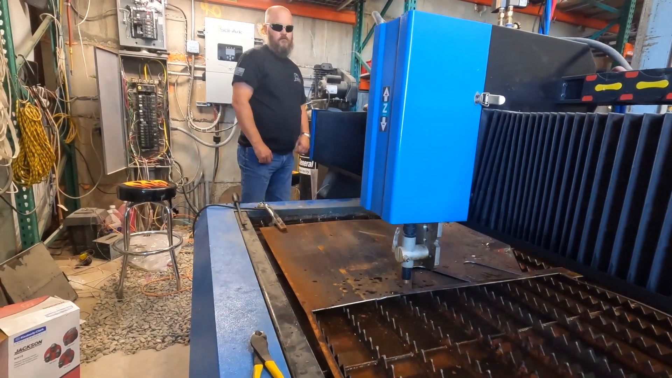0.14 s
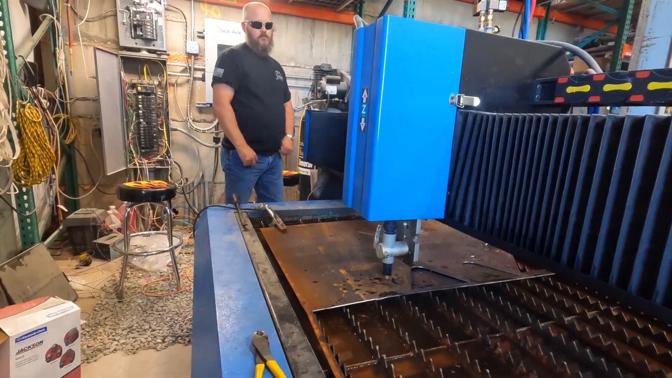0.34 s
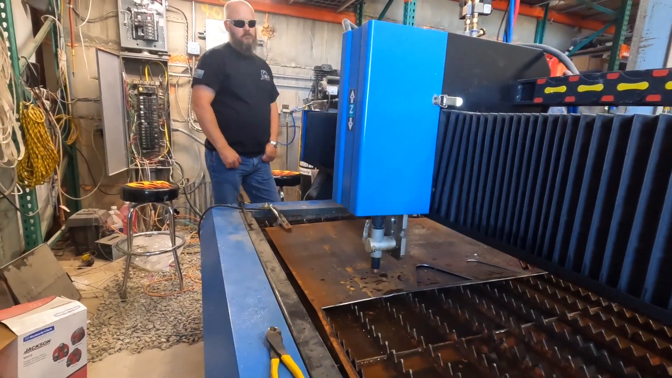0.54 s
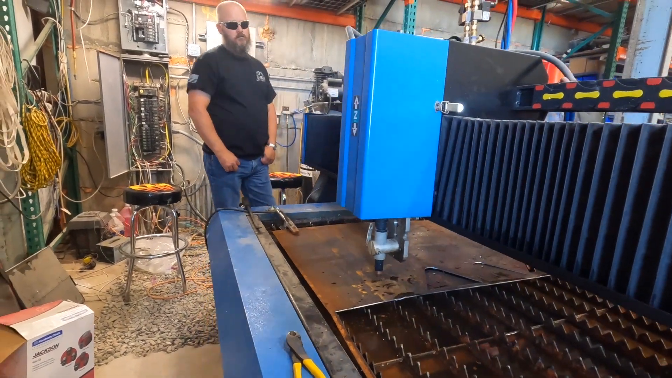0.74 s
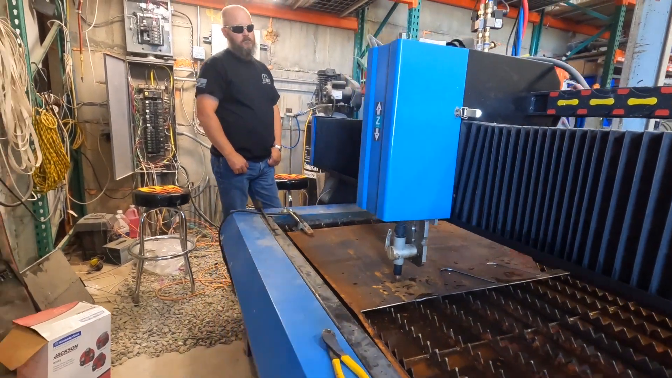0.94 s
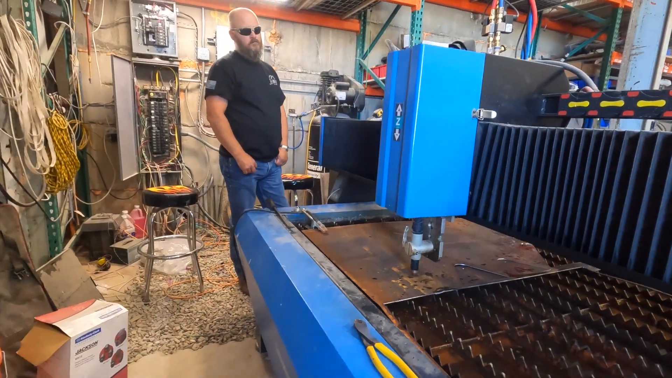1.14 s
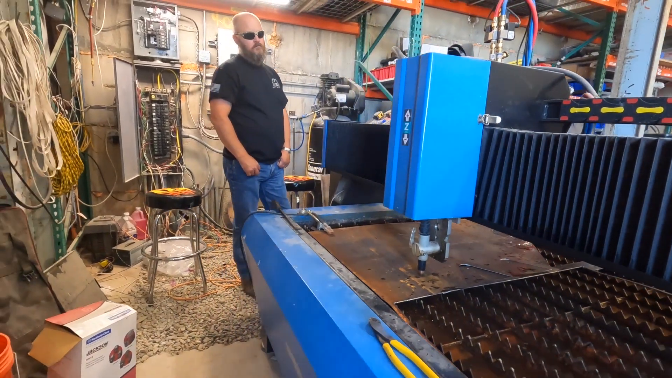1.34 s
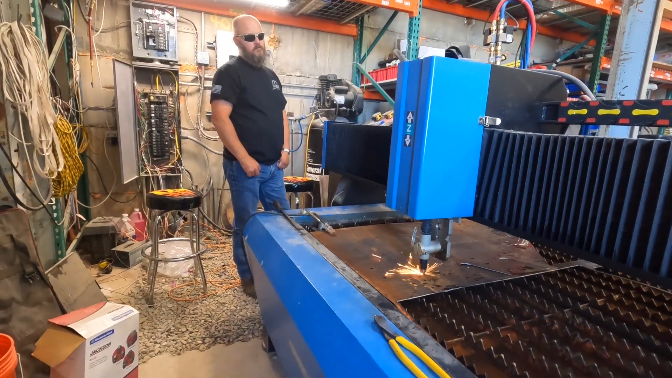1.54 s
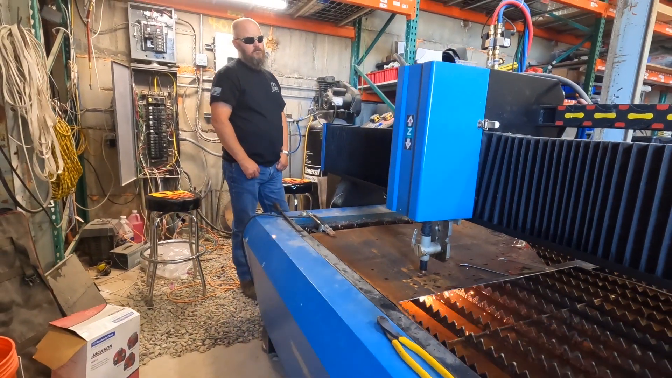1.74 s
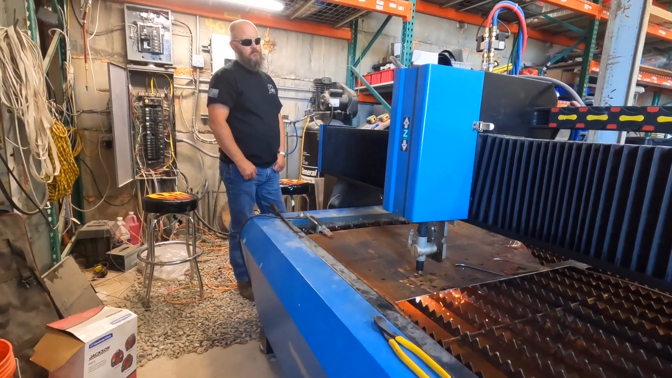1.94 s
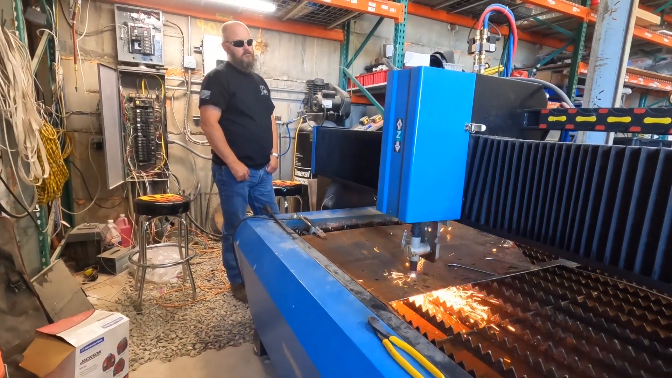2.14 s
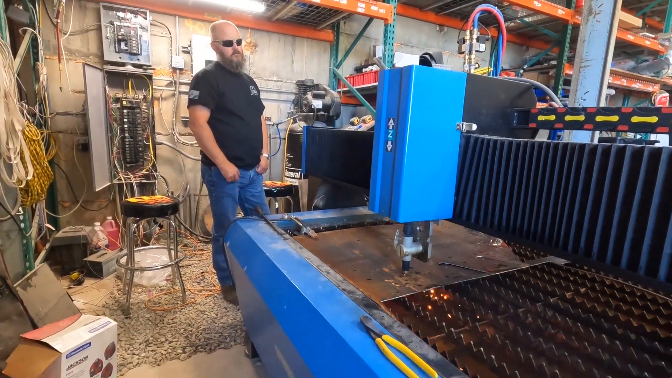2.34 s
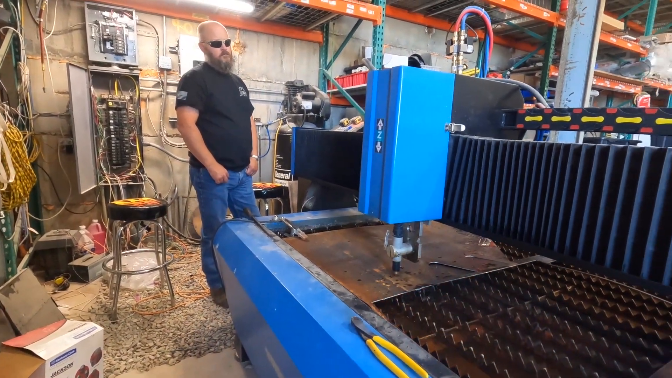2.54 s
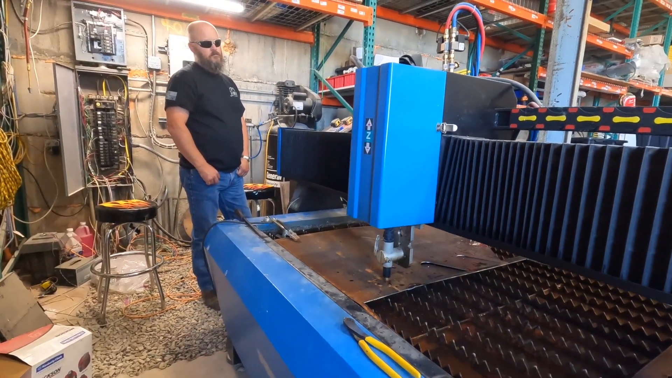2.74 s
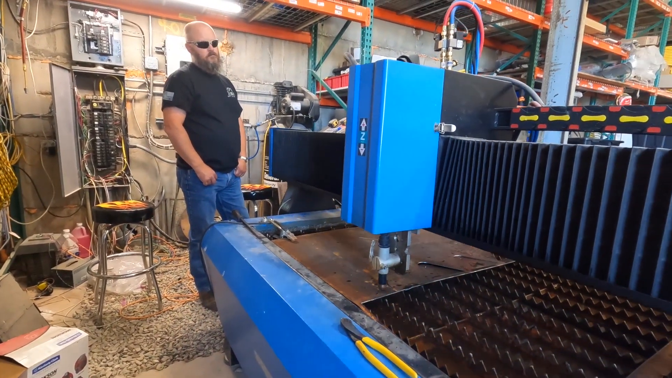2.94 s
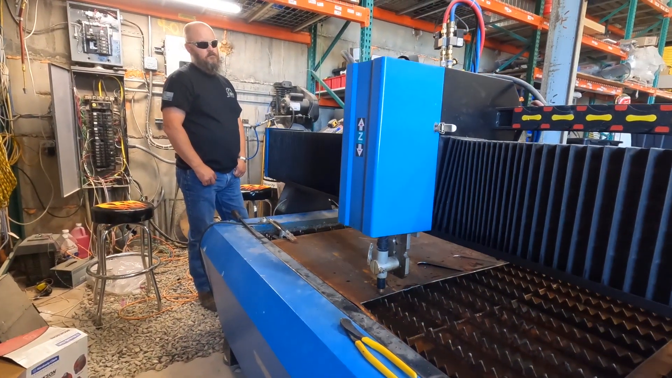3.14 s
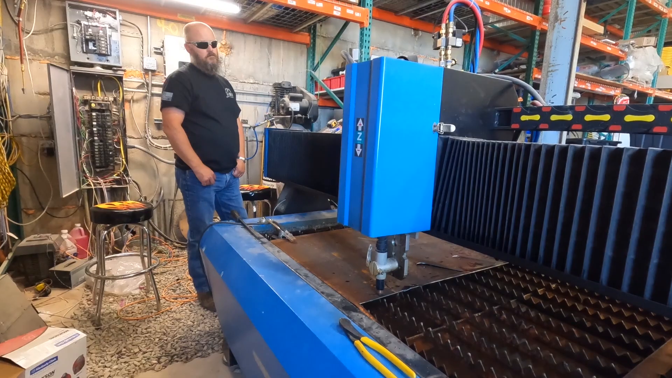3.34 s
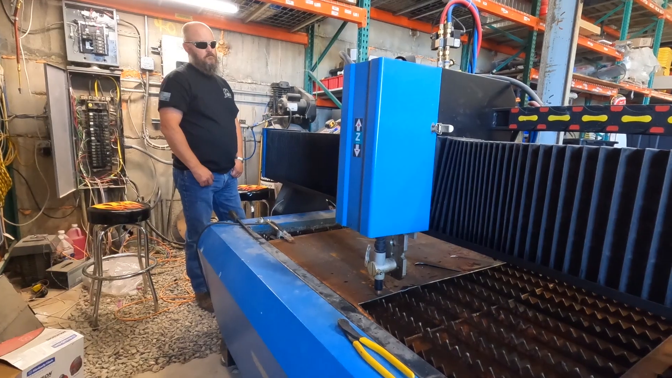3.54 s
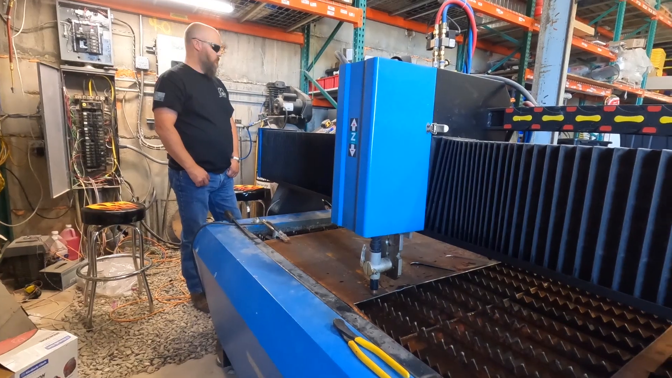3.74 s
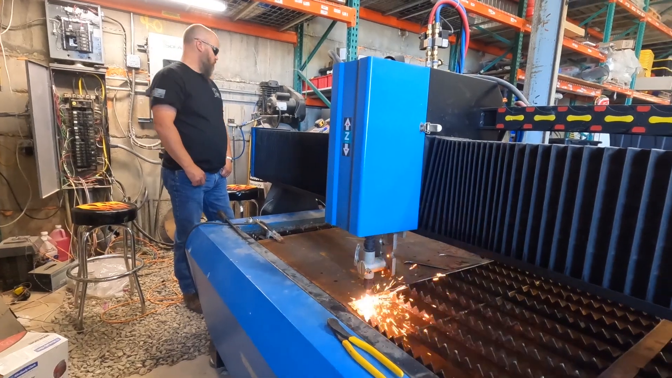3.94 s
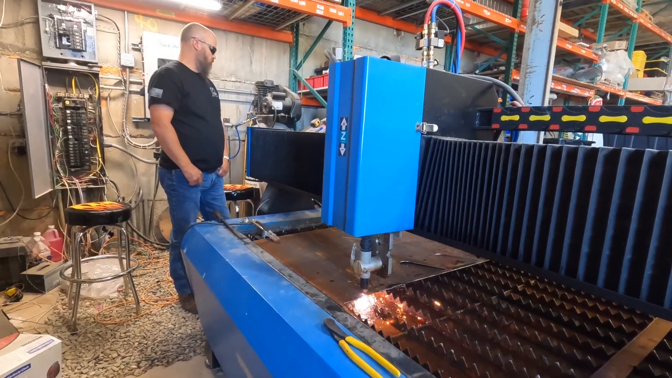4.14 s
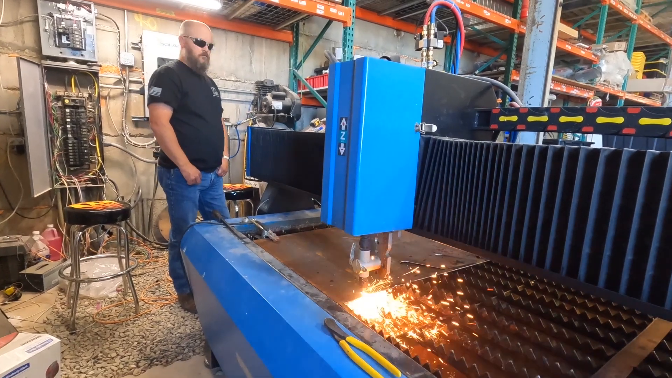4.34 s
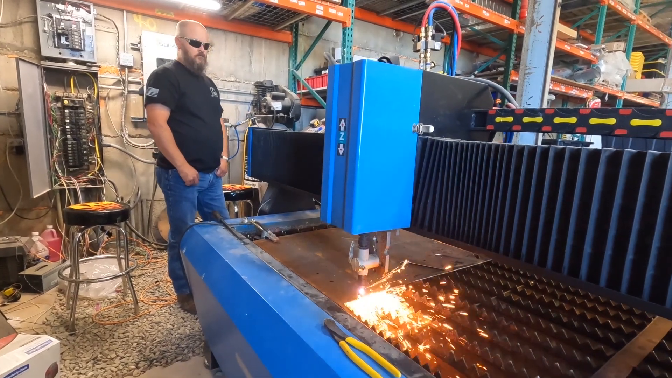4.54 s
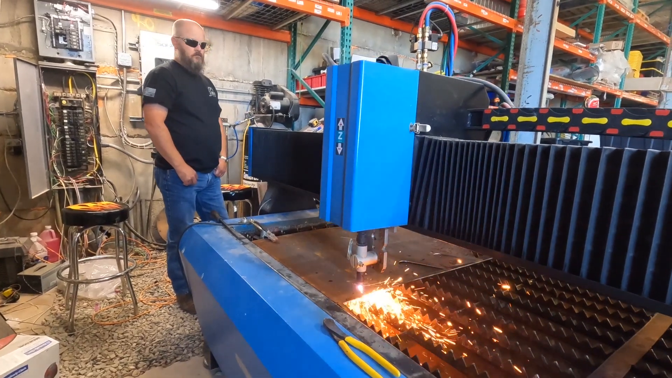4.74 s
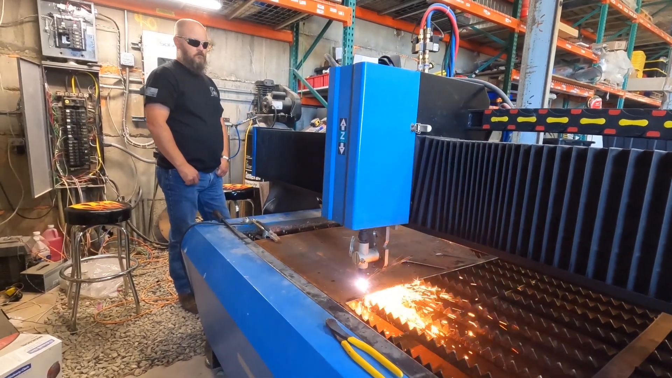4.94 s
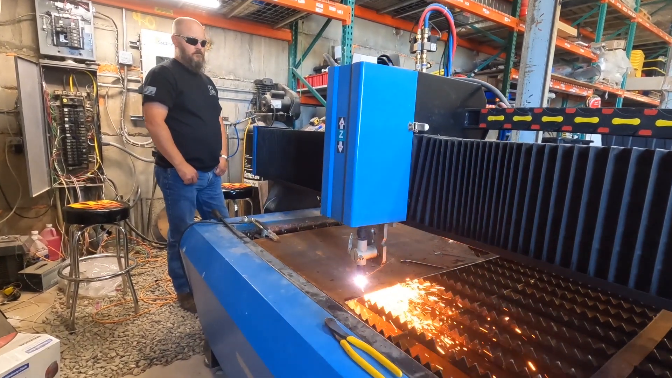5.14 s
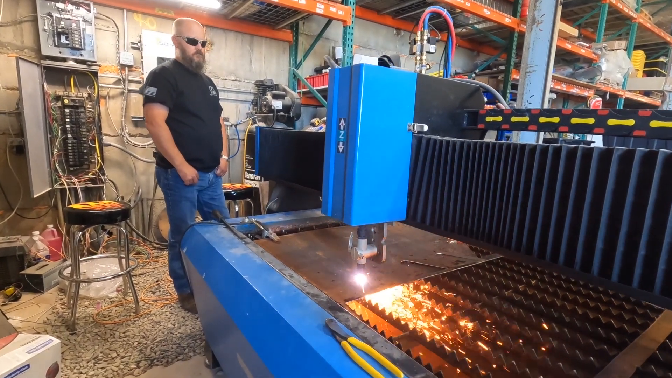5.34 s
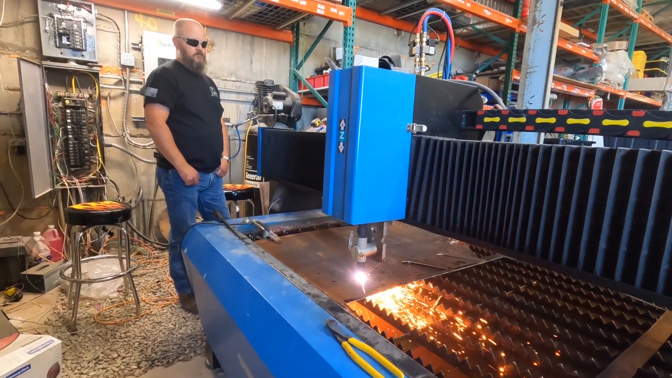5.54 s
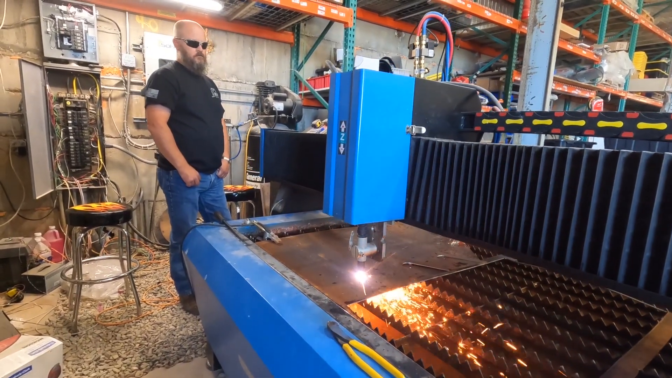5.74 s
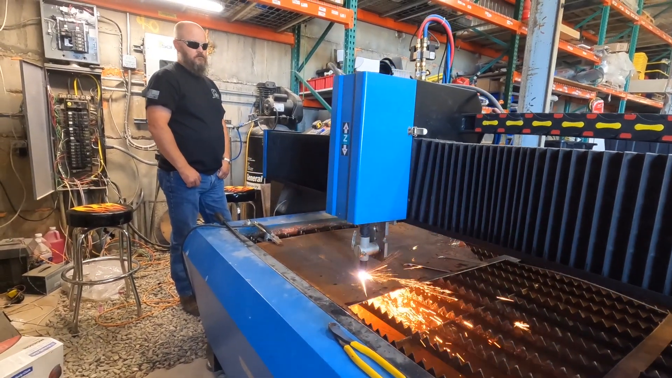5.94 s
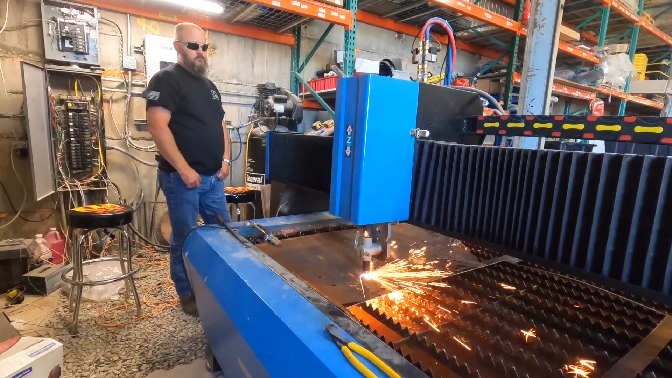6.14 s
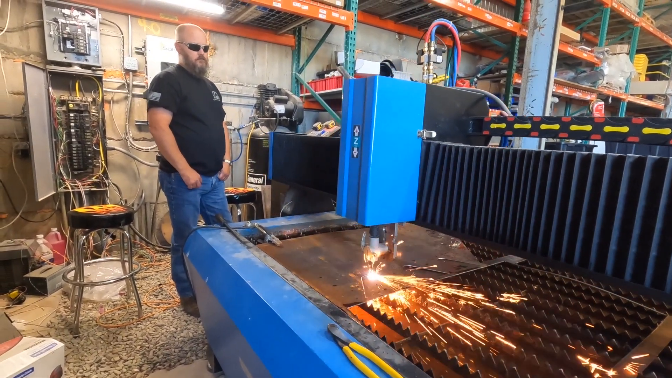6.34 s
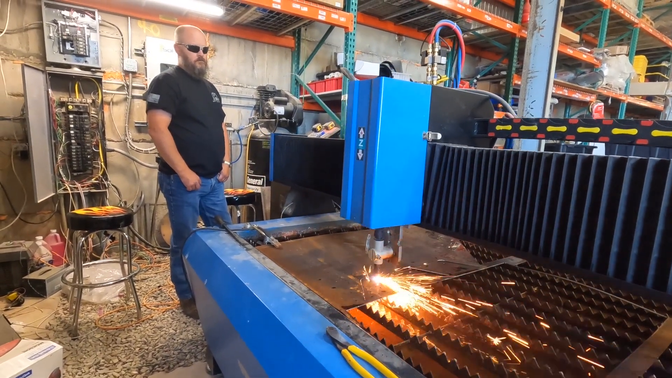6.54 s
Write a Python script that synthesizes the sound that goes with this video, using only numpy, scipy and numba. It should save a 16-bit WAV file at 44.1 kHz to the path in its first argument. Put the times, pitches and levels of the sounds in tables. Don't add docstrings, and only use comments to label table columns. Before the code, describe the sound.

Plasma torch close up: thin air hiss, short gap, sputtering pierce that cuts out, more air, another gap, then a loud steady howling cut through steel.

```python
import sys
import numpy as np
from scipy import signal
from scipy.io import wavfile
from numba import njit

SR = 44100
rng = np.random.default_rng(int(sys.argv[2]) if len(sys.argv) > 2 else 0)


def materialize(psi):
    bounded = np.clip(np.atleast_2d(psi).T, -1, 1)
    quanta = np.round(bounded * 32767).astype(np.int16)
    wavfile.write(sys.argv[1], SR, quanta)


def natural_amplitude(level_db):
    exponent = np.asarray(level_db, float) / 20
    return 10 ** exponent


N = 290619

# (opens [s], rise [s], steepness of the rise [power], shuts [s], fall [dB/s])
STAGES = [
    (-.2, .05, 1, 1.225, 159),
    (1.533, 0.052, 1.65, 2.24, 900),
    (2.312, 0.042, .75, 2.48, 100),
    (2.46, 0.094, 0.67, 3.565, 400),
    (3.85, 0.057, 5.5, 3.912, 401),
    (3.926, 0.0063, 1, 7, 303),
]
# (low edge [Hz], high edge [Hz])
AIR_BANDS = [(13250, 14200), (14200, 14750), (14750, 15150)]


def torch():
    # (frequency [Hz], density [dB per Hz])
    melt_colour = [(70, -40), (130, -28), (190, -15.5), (240, -2), (330, -12), (450, 0)]
    arc_colour = [(220, -30), (380, -21.5), (444, -13.5), (738, 1), (824, -1), (1030, -3), (1800, 2),
                  (2340, -49), (3960, -120)]
    nozzle_colour = [(7200, 3), (8200, -8), (8900, -11.5), (9600, -5.5), (10500, -1), (11300, 1.5),
                     (12200, -3.5), (13000, -12), (13700, -37)]
    # (time [s], factor [1])
    patchiness = [(0, 2.7), (1.5, 2), (1.6, 0.77), (2.4, 0.6), (5.8, 0.51), (6.0, 1.6), (6.25, 2.1),
                  (6.35, 1.9), (6.59, 2.2)]

    rumble_db, roar_db, hiss_db, sizzle_db = levels()
    gust_db = gusts()
    roar_db = with_tail(roar_db, wet_db=-13, t60=0.35) + 0.62 * gust_db
    hiss_db = with_tail(hiss_db, wet_db=-11, t60=0.34) + gust_db
    sizzle_db = with_tail(sizzle_db, wet_db=-6.5, t60=0.19) + 0.78 * gust_db
    flow = 0.33 * drift(13.0) + 0.62 * drift(63)
    flutter, = in_time(patchiness)

    out = natural_amplitude(rumble_db) * turbulence(melt_colour, 0.84 * flow, patchy_db=5.5, count=7)
    roar = natural_amplitude(roar_db - 1.0) * turbulence(arc_colour, 2.1 * flow, patchy_db=1.43, count=7)
    out += [echoed(roar[0]), roar[1]]
    crackle_db = 0.89 * flow + 1.3 * drift(170)
    out += natural_amplitude(sizzle_db) * turbulence(nozzle_colour, crackle_db, patchy_db=0.95 * flutter, count=12)
    hiss = natural_amplitude(hiss_db) * thin_start(hollowed(jet(flow, flutter)))
    out[0] += echoed(hiss + whistles())
    out[0] += natural_amplitude(roar_db + 0.49 * flow) * plate_ring()
    return out, natural_amplitude(sizzle_db) * air(flutter)


def jet(flow, flutter):
    # (frequency [Hz], density [dB per Hz])
    hiss_colour = [(1600, -3.5), (1900, -2), (3000, 0), (4500, 3.5), (6000, 0), (7000, -1), (7800, -17.5)]
    # (from [s], to [s], broad hiss [dB], width of howls [factor])
    courses = [
        (0, 0.497, -7, 0.89),
        (.55, 1.52, -6, 0.71),
        (1.6, 2.317, -3.5, 1),
        (2.35, 3.57, -2, 1),
        (3.87, 4.7, -3.5, 0.85),
        (4.86, 5.902, -4, 0.89),
        (6.152, 6.592, -4.5, 0.78),
    ]
    # (start pitch [Hz], end pitch [Hz], start and end over hiss [dB, dB])
    howls = [
        [(1030, 1150, -34, -31), (2750, 2280, -9.5, -13.5), (3560, 3980, -5.5, -2), (5550, 5600, -6, -8.5)],
        [(1080, 1200, -28, -25.5), (2300, 3300, -8, -20), (3980, 4500, -2.5, -12.5), (5980, 4700, -10, -13)],
        [(1520, 1700, -29, -27), (2150, 2630, -1, -3.5), (3260, 3770, -8, -7), (5100, 5040, -10, -8.5)],
        [(1190, 1300, -17.5, -21.5), (2728, 2800, -10, -12.5), (4600, 4250, -17, -19), (5740, 5500, -17, -10.5)],
        [(1800, 1680, -16.5, -24), (2390, 2270, -6, -13.5), (3390, 3440, -3, -8.5), (4720, 5100, -14, -9.5)],
        [(1730, 1520, -16, -21), (2530, 2760, -7, -11.5), (3450, 3350, -6, -4), (5060, 5300, -11, -10.5)],
        [(1740, 1600, -32, -26), (2350, 2520, -14.5, -5), (3800, 4240, -12.5, -11), (4850, 4420, -12, -12)],
    ]
    howl_widths = (530, 940, 900, 875)

    broad_db, spread = in_time([(s, db, w) for start, end, db, w in courses for s in (start, end)])
    out = natural_amplitude(broad_db) * turbulence(hiss_colour, 1.4 * flow, patchy_db=1.52 * flutter, count=14)[0]
    for k, width_hz in enumerate(howl_widths):
        path = [(course[side], *four[k][side::2]) for course, four in zip(courses, howls) for side in range(2)]
        hz, level_db = in_time(path)
        wander = 1 + 0.008 * drift(20) + 0.013 * drift(3)
        flicker_db = 0.49 * flow + 1.8 * drift(25)
        sway_db = 1.2 * np.minimum(flutter, 1) * drift(2.7)
        out += natural_amplitude(level_db + flicker_db + sway_db) * narrow_noise(hz * wander, spread * width_hz)
    return out


def levels():
    # (melt rumble [dB], arc roar [dB], nozzle sizzle [dB])
    stage_mix = [
        (-60, -47.5, -51.5),
        (-44, -28.5, -34.5),
        (-63, -40.5, -42),
        (-61.5, -46.5, -37),
        (-60, -46, -27),
        (-56, -32.5, -34),
    ]
    # (time [s], level [dB])
    jet_force = [(0, -20), (.05, -23.5), (.45, -27.5), (.87, -28.5), (.96, -29), (1.22, -30.5),
                 (1.56, -21.5), (1.9, -22.5), (2.28, -21.5), (2.36, -25), (2.85, -22.5), (2.97, -21.5),
                 (3.55, -23), (3.95, -18.5), (4.09, -19.5), (5.12, -19.5), (6.1, -19.5), (6.59, -24.5)]
    # (time [s], roar [dB], melt over roar [dB], t60 [s])
    bites = [(.588, -53, 5.5, .15), (.674, -53, 7, 0.17), (.94, -39, -21, 0.48), (1.646, -22, -9, 0.19),
             (1.86, -23, -14, 0.5), (2.14, -33, -24, 0.37), (2.312, -26, -8.5, 0.24),
             (2.385, -32, -33, 0.42), (3.3, -41, -26, .5), (3.52, -44.5, -7, 0.19),
             (3.937, -23, -14, 0.044), (4.2, -31.5, -18, 1.2), (5.0, -34.5, -20, 1.3),
             (5.5, -40, -12, 0.25), (5.999, -33.5, -8, 0.23), (6.11, -33, -15, 0.23)]
    rise_s, low_fall = 0.01, 2.5

    rumble_db, roar_db, sizzle_db = np.transpose(stage_mix)
    roar = natural_amplitude(2 * valve(roar_db, 0.68, low_fall))
    rumble = natural_amplitude(2 * valve(rumble_db, 0.9, low_fall))
    for s, db, melt_db, t60 in bites:
        t = np.arange(N) / SR - s
        decay_db = db - 60 * np.maximum(t, 0) / t60
        bite = np.clip(1 + t / rise_s, 0, 1) ** 2 * natural_amplitude(2 * decay_db)
        roar = roar + bite
        rumble = rumble + natural_amplitude(2 * melt_db) * bite
    hiss_db = in_time(jet_force)[0] + valve(np.zeros(len(STAGES)), 0, 0.93)
    return 10 * np.log10(rumble), 10 * np.log10(roar), hiss_db, valve(sizzle_db, 0, 0.85)


def valve(hold_db, lag, fall_share):
    t, gain = np.arange(N) / SR, np.full(N, 1e-6)
    for (opens, rise, power, shuts, fall), db in zip(STAGES, hold_db):
        swell = np.clip((t - opens) / rise - lag, 0, 1) ** power
        fallen_db = fall_share * fall * np.maximum(t - shuts, 0)
        gain = np.maximum(gain, swell * natural_amplitude(db - fallen_db))
    return 20 * np.log10(gain)


def gusts():
    # (time [s], swing [dB], half length [s])
    swings = [(0.065, 2.5, 0.008), (0.26, -2.3, 0.02), (0.53, 1, 0.0073), (0.653, -1.5, 0.04),
              (0.77, 1.7, 0.027), (0.858, -0.5, 0.022), (0.975, 1.3, 0.027), (1.065, -1, 0.008),
              (1.661, 2.5, 0.0087), (1.77, 1, 0.014), (1.803, -0.5, 0.0071), (1.91, -1.8, 0.013),
              (1.95, 2.5, 0.008), (2, -2, 0.012), (2.042, -0.3, 0.015), (2.153, -0.2, 0.02),
              (2.284, 3.5, 0.014), (2.823, -0.5, 0.027), (3.23, 2.5, 0.0087), (3.357, -0.5, 0.017),
              (3.982, 3, 0.014), (4.107, -4, 0.012), (4.196, 1.8, 0.012), (4.237, -1, 0.0072),
              (4.357, 2.1, 0.012), (4.476, -0.6, 0.045), (4.696, -1.5, 0.0074), (4.914, 0.2, 0.013),
              (5.343, 0, 0.01), (5.742, 0.5, 0.012), (5.91, -3, 0.013), (6.04, 0.6, 0.012),
              (6.267, 1, 0.0073), (6.3, -2.2, 0.012)]
    ignition_trim = (3.986, -3.5, 0.018)
    t = np.arange(0, N + 20, 20) / SR
    total_db = 0
    for s, db, half in swings + [ignition_trim]:
        total_db = total_db + db * np.exp(-0.5 * ((t - s) / max(half, 0.003)) ** 2)
    return np.interp(np.arange(N) / SR, t, total_db)


def thin_start(x):
    flat = np.zeros(len(STAGES))
    late = np.minimum(natural_amplitude(valve(flat, 0.28, 1) - valve(flat, 0, 0.89)), 1)
    body = signal.sosfiltfilt(signal.butter(4, 2970, fs=SR, output="sos"), x)
    return x - (1 - late) * body


def hollowed(x):
    # (time [s], frequency [Hz], depth [0-1])
    main_hollow = [(0, 3500, 0.02), (5.95, 3510, 0.09), (6.2, 3520, 0.53), (6.35, 3380, 0.7),
                   (6.59, 3280, 0.42)]
    # (time [s], frequency [Hz], depth [0-1])
    late_hollow = [(0, 2150, 0), (5.5, 2150, 0), (5.65, 2150, .35), (5.86, 2150, .35), (5.95, 2150, 0),
                   (6.59, 2150, 0)]
    width_hz = 620
    r = np.full(N, np.exp(-np.pi * width_hz / SR))
    for rows in (main_hollow, late_hollow):
        hz, depth = in_time(rows)
        x = x - np.clip(depth, 0, 1) * resonate(x, hz, r, SR)
    return x


def whistles():
    # (start [s], end [s], frequency [Hz], width [Hz], level [dB])
    short_whistles = [(0, .13, 4600, 700, -27.5), (.12, .25, 6540, 400, -38), (.18, .3, 5200, 400, -32),
                      (.28, .5, 5880, 450, -30.5), (.42, .6, 4700, 600, -35), (.5, .62, 6250, 300, -38.5),
                      (.55, .95, 2950, 600, -38.5), (.88, 1.04, 5550, 380, -31.5),
                      (.94, 1.23, 4450, 300.2, -28), (1.1, 1.24, 5100, 400, -38),
                      (2.03, 2.1, 2750, 300, -24), (2.26, 2.31, 2600, 900, -22),
                      (2.42, 2.49, 970, 350, -33.5), (2.47, 2.56, 1170, 400, -31),
                      (2.8, 2.93, 6300, 900, -29), (3.2, 3.56, 5600, 400, -34),
                      (3.955, 4.025, 3360, 440, -19.5), (3.97, 4.01, 2450, 350, -31),
                      (3.98, 4.7, 5340, 900, -41.5), (4.0, 4.1, 4900, 410, -25.5),
                      (4.07, 4.095, 2340, 400, -25), (4.1, 4.15, 4600, 400, -24),
                      (4.16, 4.23, 4920, 550, -26.5), (4.3, 4.42, 3470, 350, -30),
                      (4.48, 4.55, 3450, 202, -33), (4.8, 6.0, 3495, 450, -27.5),
                      (5.3, 5.6, 5100, 500, -30), (5.4, 5.95, 4110, 200, -30), (5.97, 6.1, 4600, 700, -28),
                      (6.05, 6.59, 2470, 400, -31), (6.28, 6.52, 872, 120, -38.5)]
    # (start [s], end [s], frequency [Hz], width [Hz], level [dB])
    breaths = [(1.536, 1.555, 10500, 3000, -58), (1.545, 1.565, 4830, 980, -37),
               (1.565, 1.575, 1320, 500, -45), (1.567, 1.585, 2300, 1200, -29),
               (1.574, 1.603, 3800, 1200, -26.5), (2.783, 2.987, 363, 20, -60),
               (3.497, 3.9, 3100, 600, -64), (3.548, 3.903, 2200, 1200, -66), (3.557, 3.86, 324, 15, -67.5),
               (3.866, 3.886, 10500, 3300, -57), (3.875, 3.903, 4960, 1000, -42),
               (3.892, 3.932, 700, 770, -50), (3.932, 3.956, 5500, 2700, -23),
               (3.939, 3.942, 1800, 1800, -22)]
    rows = short_whistles + breaths
    t, out, room = np.arange(N) / SR, np.zeros(N), round(1.5 * SR)
    flicker_db, sway = np.tile(drift(11), 2), np.tile(drift(7.2), 2)
    for k, (start, end, hz, width_hz, db) in enumerate(rows):
        swell = 0.006 + 0.19 * (end - start)
        fade = 0.014 + 0.072 * (end - start)
        at = max(round((start - 0.2) * SR), 0)
        corners = [start - swell / 2, start + swell / 2, end - fade, end + fade / 2]
        shape = np.interp(t[at:at + room], corners, [0, 1, 1, 0])
        first = k * N // len(rows)
        own = slice(first, first + room)
        tone = natural_amplitude(db + flicker_db[own]) * narrow_noise(hz * (1 + 0.006 * sway[own]), width_hz, size=room)
        out[at:at + room] += shape * tone[:len(shape)]
    return out


def air(flutter):
    band_levels = [-30.5, -27, -30]
    band_shyness = [.45, 0, .15]
    # (time [s], length [s])
    fleck_times = [(1.554, .02), (1.812, .03), (2.579, .03), (2.69, .07), (2.97, .03), (3.18, 0.037),
                   (3.9, .03), (3.993, .035), (4.278, .09), (4.503, .03), (4.596, .03), (4.759, .05),
                   (4.855, .025), (4.969, .09), (5.549, .03), (5.873, .05)]
    needs = 1.65
    out, together = 0, drift(9)
    flecks = gate([(s, length, 0) for s, length in fleck_times])
    for hz, db, shy in zip(AIR_BANDS, band_levels, band_shyness):
        sos = signal.butter(5, hz, "band", fs=SR, output="sos")
        band = signal.sosfilt(sos, rng.standard_normal((2, N)))
        chance = np.minimum(flutter, 2) * (0.1 * together + 0.2 * drift(14))
        loose = np.minimum(flutter, 2.1) + chance - needs - shy
        opening = np.clip(6 * loose + (shy < 0.3) * 8 * flecks, 0, 1)
        out = out + natural_amplitude(db) * rms_one(band) * opening
    return out


def plate_ring():
    # (frequency [Hz], width [Hz], level against the roar [dB])
    modes = [(622, 110, -30.5), (842, 82, -13.5), (1800, 390, -6)]
    return sum(natural_amplitude(db + 3.7 * drift(10.2)) * narrow_noise(hz, width_hz) for hz, width_hz, db in modes)


def spits():
    # (time [s], peak [dB], frequency [Hz], t60 [s])
    knocks = [(1.21, -48, 310, 0.11), (1.642, -27, 423, 0.08), (1.771, -28, 236, 0.08),
              (1.874, -24, 233, 0.1), (1.934, -42, 231, 0.044), (2.028, -36, 244, 0.081),
              (2.194, -29, 279, 0.066), (2.314, -20.5, 238, 0.046), (3.09, -37, 224, 0.062),
              (3.535, -42, 320, 0.094), (3.934, -45, 260, 0.08), (4.193, -39, 256, 0.052),
              (4.243, -47, 276, 0.056), (4.308, -44, 314, 0.063), (6.009, -32, 396, 0.075),
              (2.388, -7, 830, 0.037), (2.39, -27, 664, 0.065), (3.931, -19, 795, 0.03),
              (0.9358, -20, 1805, 0.063)]
    out = np.zeros(N)
    t = np.arange(round(0.2 * SR)) / SR
    for (s, peak_db, hz, t60), white in zip(knocks, rng.standard_normal((len(knocks), len(t)))):
        sos = signal.butter(2, [1.1 * hz, 1.84 * hz], "band", fs=SR, output="sos")
        puff = rms_one(signal.sosfilt(sos, white))
        shape = (1 - np.exp(-t / 0.0056)) ** 2 * natural_amplitude(-60 * t / max(t60, 0.02))
        at = round(s * SR)
        out[at:at + len(t)] += natural_amplitude(peak_db + 3.0) * shape * (np.sin(2 * np.pi * hz * t) + 0.34 * puff)
    return out


def side_puffs():
    # (time [s], length [s], level [dB])
    puffs = [
        (2.305, 0.032, -47),
        (3.9, 0.027, -46),
        (3.57, .03, -56),
    ]
    sos = signal.butter(3, [3500, 10500], "band", fs=SR, output="sos")
    return gate(puffs) * rms_one(signal.sosfilt(sos, rng.standard_normal(N)))


def echoed(x):
    # (lag [s], level [dB])
    reflections = [(.0037, -22), (.0064, -18), (.0098, -18.5), (.0153, -19), (.022, -19)]
    shift_s = 0.00021
    now, wet = np.arange(N), 0
    for k, (lag, db) in enumerate(reflections):
        heard_from = now - SR * (lag + shift_s * drift(1.5))
        wet = wet + natural_amplitude(db) * np.interp(heard_from, now, x) * (-1) ** k
    return (x + wet) / np.sqrt(1 + sum(natural_amplitude(2 * db) for lag, db in reflections))


def with_tail(level_db, wet_db, t60):
    power, r = natural_amplitude(2 * level_db), natural_amplitude(-120 / (t60 * SR))
    held = signal.lfilter([1 - r], [1, -r], power)
    return 10 * np.log10(power + natural_amplitude(2 * wet_db) * held)


def fan():
    fan_hz, level_db, second_db = 166, -63, -15
    duck_from_db, duck_share, duck_s = -45.5, 1.25, 0.16
    r = np.exp(-1 / (duck_s * SR))
    duck_db = signal.lfilter([1 - r], [1, -r], np.maximum(levels()[1] - duck_from_db, 0))
    turn = 2 * np.pi * fan_hz * np.arange(N) / SR + 0.44 * drift(4.3)
    gain = natural_amplitude(level_db - duck_share * duck_db + 0.8 * drift(4.8))
    return gain * (np.sin(turn) + natural_amplitude(second_db) * np.sin(2 * turn))


def workshop_air():
    # (frequency [Hz], density [dB per Hz])
    room_colour = [(24, -54), (40, -34), (174, -10.5), (268, -12), (329, -14), (386, -14.5), (872, -14),
                   (2530, -19), (3170, -5), (5470, -33), (9000, -51), (11700, -86), (19800, -120)]
    return natural_amplitude(-60) * turbulence(room_colour, 0, patchy_db=1.0, count=15)


def turbulence(colour, shared_db, patchy_db, count):
    # (frequency [Hz], level [dB])
    stereo_width = [(60, -22), (300, -23), (700, -24.5), (1500, -46), (10300, -32), (10900, -24),
                    (11600, -11), (12300, 1.5), (13000, -14), (15000, -6)]
    edges = np.geomspace(colour[0][0], colour[-1][0], count + 1)
    white, out = rng.standard_normal((2, 2, N)), np.zeros((2, N))
    for k, (low, high) in enumerate(zip(edges, edges[1:])):
        hz = np.sqrt(low * high)
        sos = signal.butter(2, [low, high], "band", fs=SR, output="sos")
        gain = natural_amplitude(at_hz(colour, hz) + patchy_db * drift(19.0))
        mid = gain * signal.sosfilt(sos, white[k % 2, 0])
        out[0] += mid
        if hz < 1000 or hz > 10000:
            side = gain * signal.sosfilt(sos, white[k % 2, 1]) - 0.29 * mid
            out[1] += natural_amplitude(at_hz(stereo_width, hz)) * side
    if colour[0][0] < 1000:
        out[1] *= natural_amplitude(6.0 * drift(3.5) - 1.0)
    out *= natural_amplitude(shared_db)
    return out / np.sqrt(np.mean(out[0] ** 2))


def narrow_noise(hz, width_hz, size=N):
    hz = hz + np.zeros(size)
    width_hz = np.maximum(width_hz, 12) + np.zeros(size)
    r = np.exp(-np.pi * width_hz / SR)
    once = resonate(rng.standard_normal(size), hz, r, SR)
    return resonate(once, hz, r, SR) / np.sqrt(np.pi / 2 * width_hz / SR)


@njit
def resonate(x, hz, r, rate):
    y = np.zeros(len(x))
    for i in range(2, len(x)):
        drive = (1 - r[i] ** 2) / 2 * (x[i] - x[i - 2])
        y[i] = drive + 2 * r[i] * np.cos(2 * np.pi * hz[i] / rate) * y[i - 1] - r[i] ** 2 * y[i - 2]
    return y


def drift(rate):
    r = np.exp(-40 * np.pi * rate / SR)
    slow = signal.lfilter([1], [1, -2 * r, r * r], rng.standard_normal(N // 20 + 4002))[4000:]
    return np.interp(np.arange(N) / 20, np.arange(len(slow)), rms_one(slow))


def gate(rows):
    t, out = np.arange(N) / SR, 0
    for s, length, db in rows:
        corners = [s - 0.004, s + 0.004, s + length, s + length + 0.009]
        out = out + natural_amplitude(db) * np.interp(t, corners, [0, 1, 1, 0])
    return out


def in_time(rows):
    s, *columns = np.transpose(rows)
    return [np.interp(np.arange(N) / SR, s, column) for column in columns]


def at_hz(points, hz):
    point_hz, db = np.transpose(points)
    return np.interp(np.log(hz), np.log(point_hz), db)


def rms_one(x):
    return x / np.sqrt(np.mean(x ** 2) + 1e-20)


def scene():
    body, top = torch()
    body = body + workshop_air()
    body[0] += fan()
    body += [spits(), side_puffs()]
    low_pass = signal.ellip(11, 0.3, 75, AIR_BANDS[0][0], fs=SR, output="sos")
    mid, side = signal.sosfilt(low_pass, body) + top
    return np.array([mid + side, mid - side])


def band_limit(x):
    return signal.sosfilt(signal.butter(12, 15400, fs=SR, output="sos"), x)


def record(dry):
    hole_hz, hole_width_hz = 8960, 230
    b, a = signal.iirnotch(hole_hz, hole_hz / hole_width_hz, fs=SR)
    holed = signal.lfilter(b, a, signal.lfilter(b, a, dry))
    mix = signal.sosfilt(signal.butter(2, 50, "high", fs=SR, output="sos"), holed)
    return band_limit(mix)


dry = scene()
out = record(dry)
materialize(out)
```